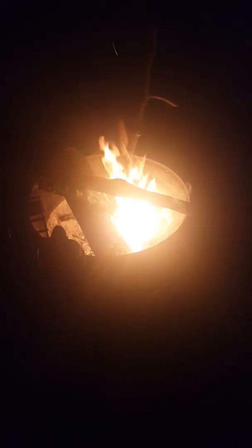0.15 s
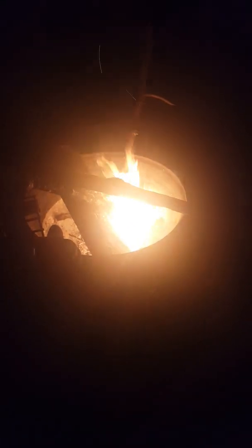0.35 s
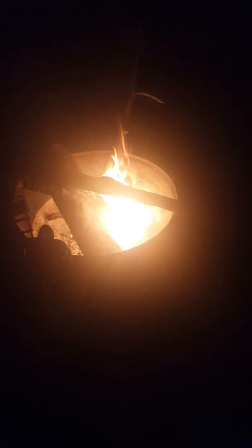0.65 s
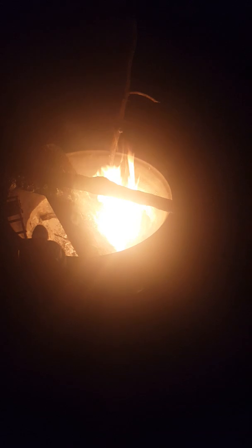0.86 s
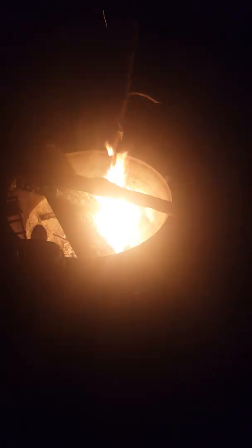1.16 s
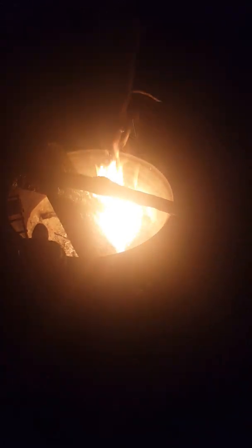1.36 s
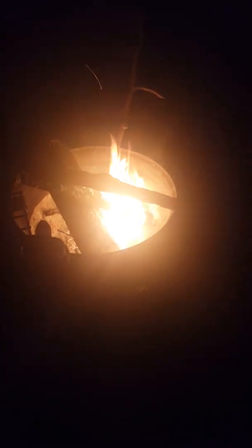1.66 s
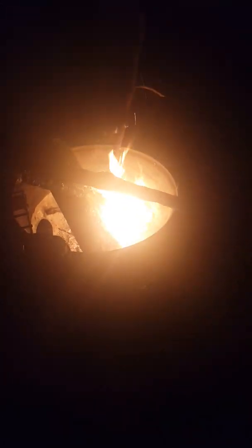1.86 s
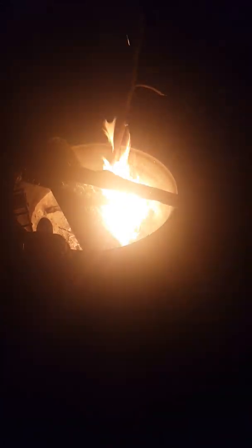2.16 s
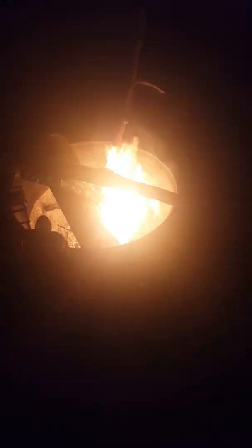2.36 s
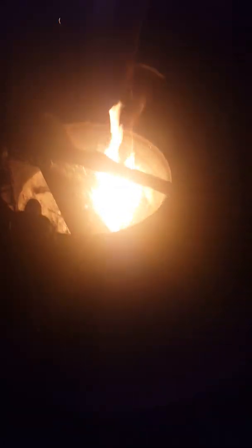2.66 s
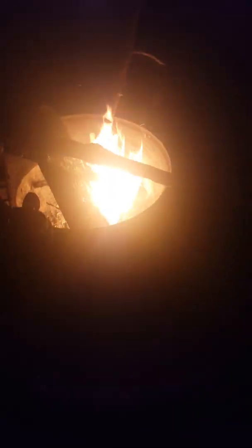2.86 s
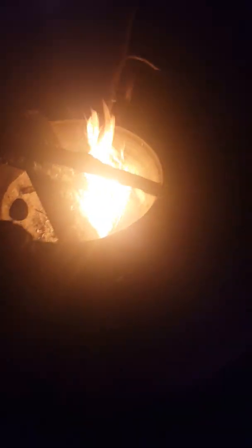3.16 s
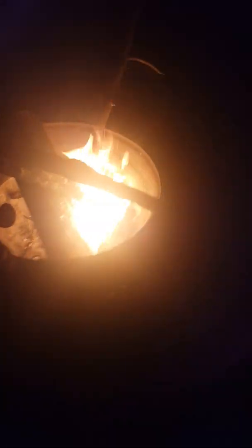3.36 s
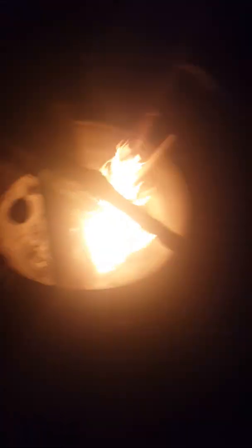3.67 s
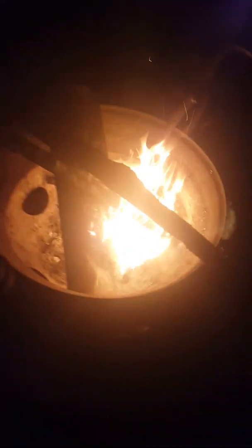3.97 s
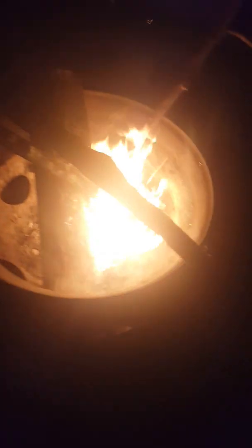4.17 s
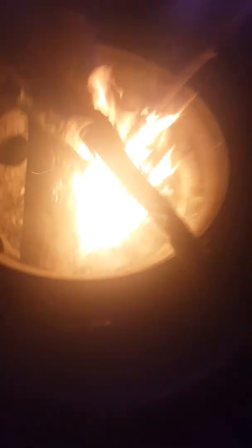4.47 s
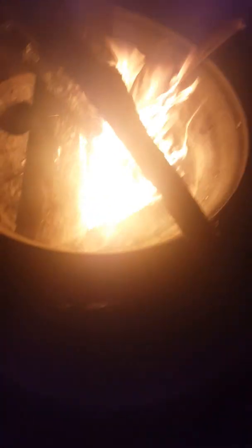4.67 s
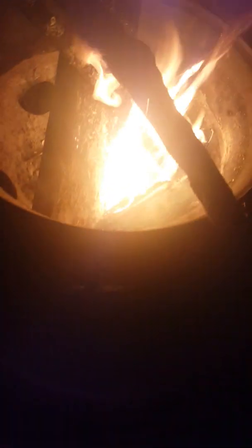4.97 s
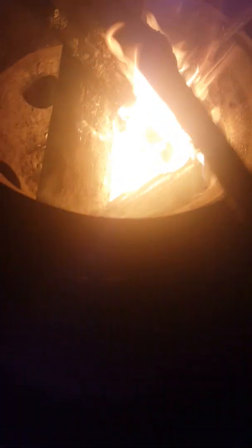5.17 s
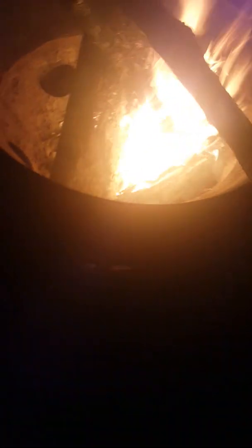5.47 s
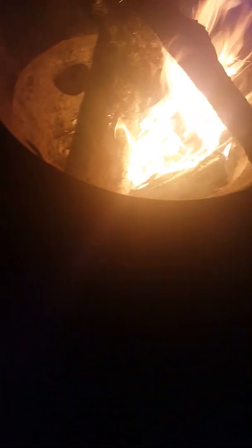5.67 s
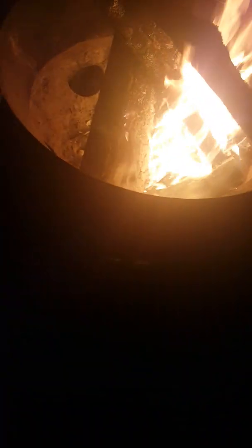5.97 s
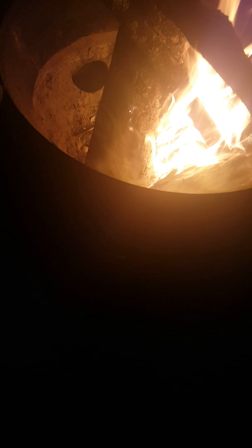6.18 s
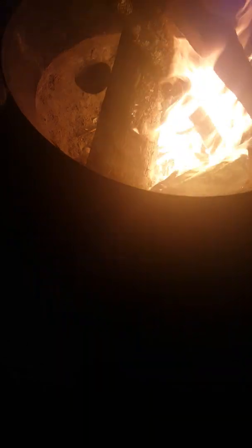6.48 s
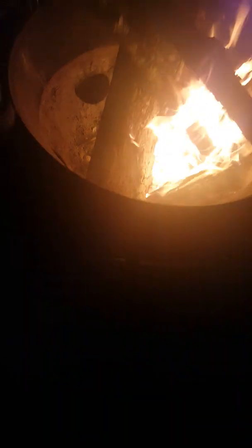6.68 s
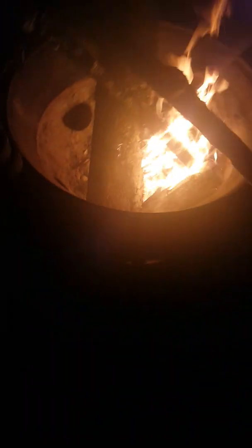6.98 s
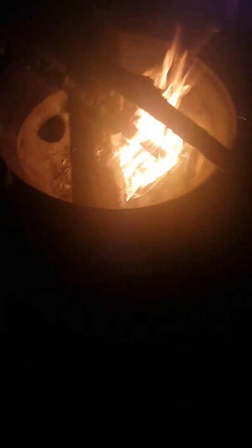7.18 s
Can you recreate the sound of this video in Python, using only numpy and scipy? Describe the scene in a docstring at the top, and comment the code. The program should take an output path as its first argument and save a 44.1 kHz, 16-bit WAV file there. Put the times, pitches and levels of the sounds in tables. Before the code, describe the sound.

A dense chorus of crickets and shimmering katydids surrounds a small campfire, heard through a hissy handheld stereo microphone. The flames rumble softly in uneven puffs. A short burst of rubbing and knocks hits the right side at about two and a half to three seconds. Then come closer, sharper pops, sputtering flares, little spits of steam and dry snaps, while a nearer cricket trill rises and fades.

```python
"""Campfire and night insects

A wood fire burns in a metal pit at night, inside a chorus of crickets and katydids, over a steady microphone hiss.
Filtered noise makes the flames, the hiss, the jets of steam and the finger's rub; short pulses make pops and knocks.
Snapping logs are ringing noise bursts, singing insects are strings of sine syllables, and faint tones waver.
A finger shifts its grip on the hand-held camera and rubs across the right microphone port."""
import sys
import numpy as np
from scipy import signal
from scipy.fft import rfft, irfft, next_fast_len
from scipy.io import wavfile

SR = 44100
rng = np.random.default_rng(int(sys.argv[2]) if len(sys.argv) > 2 else 0)


def int16_out(signal):
    """Quantize to a 16-bit WAV file."""
    q = np.round(np.clip(np.atleast_2d(signal).T, -1, 1) * 32767)
    wavfile.write(sys.argv[1], SR, q.astype(np.int16))


N = 323470
TIME = np.arange(N) / SR  # seconds
EDGE_HZ = 15900  # upper limit of the sound that is kept


def from_db(db):
    """Turns decibels into a gain."""
    return 10 ** (np.asarray(db) / 20)


def unit(x):
    """Scales a sound to an rms (average strength) of one."""
    return x / np.sqrt(np.mean(x ** 2) + 1e-20)


def follow(rows):
    """Draws straight lines between the rows of a curve, giving each column sample by sample."""
    seconds, *columns = np.transpose(rows)
    return [np.interp(TIME, seconds, column) for column in columns]


def read(points, hz):
    """Looks up a spectrum between its points, on a log-frequency axis."""
    point_hz, value = np.transpose(points)
    return np.interp(np.log(hz + 1), np.log(point_hz + 1), value)


def colour(x, gain):
    """Filters a sound by a gain that is a function of frequency."""
    size = next_fast_len(N + 4096)
    hz = np.fft.rfftfreq(size, 1 / SR)
    return irfft(rfft(x, size) * gain(hz), size)[..., :N]


def shaped(x, points):
    """Gives a sound the spectrum in a table, at unit level."""
    return unit(colour(x, lambda hz: from_db(read(points, hz))))


def drift(rate_hz):
    """Wanders by chance at unit size, joining 2 * rate_hz random points a second until 4096 run out."""
    knots = rng.standard_normal(4096)
    return unit(np.interp(TIME * rate_hz * 2, np.arange(len(knots)), knots))


def panned(db):
    """Left and right gains for a left-minus-right level difference."""
    return from_db(np.array([db, -db]) / 2)


def add(mix, s, sound):
    """Mixes a short two-channel sound in, starting at time s."""
    start = max(round(s * SR), 0)
    part = mix[:, start:][:, :sound.shape[1]]
    part += sound[:, :part.shape[1]]


def scatter(x, t60, wet_db):
    """Adds a diffuse tail of echoes, different at each port, that falls 60 dB in t60 seconds."""
    t = np.arange(SR // 2) / SR
    tail = rng.standard_normal((2, len(t))) * from_db(-60 * t / t60)
    tail /= np.linalg.norm(tail, axis=1, keepdims=True)
    return x + from_db(wet_db) * signal.fftconvolve(x, tail, axes=1)[:, :N]


def pulse(hz, cycles, crack_db, crack_t60):
    """A pressure swing that builds and dies within a few cycles, with a brief midrange crack."""
    t = np.arange(2600) / SR
    swing = np.sqrt(t) * np.exp(-t * hz / cycles) * np.sin(2 * np.pi * hz * t)
    midrange = signal.butter(2, [900, 3900], "band", fs=SR)
    grit = signal.lfilter(*midrange, rng.standard_normal(len(t)))
    crack = (unit(grit) + .14 * rng.standard_normal(len(t))) / 2
    return swing / abs(swing).max() + crack * from_db(crack_db - 60 * t / crack_t60)


def singer(hz, rate, sag_hz, waver_hz, unsteady):
    """Each wing stroke sounds one nearly pure syllable that sags in pitch."""
    strokes = np.cumsum(rate * (1 + unsteady * drift(rate_hz=3))) / SR
    stroke = (strokes + rng.random()) % 1  # 0 to 1 through each stroke
    pitch = hz - sag_hz * (2 * stroke - 1) + waver_hz * drift(rate_hz=25)
    return np.sin(np.pi * stroke) ** 4 * np.sin(2 * np.pi * np.cumsum(pitch) / SR)


def resonate(x, hz, width_hz):
    """A resonance of gain one that follows a moving pitch: shift it to 0 Hz, smooth, shift back."""
    turn = np.exp(2j * np.pi * np.cumsum(hz) / SR)
    r = np.exp(-np.pi * width_hz / SR)
    return 2 * (turn * signal.lfilter([1 - r], [1, -r], x / turn)).real


# How alike the noise is at left and right. Each row: frequency in Hz, likeness from 0 to 1.
PORT_LIKENESS = [(30, 0.92), (150, 0.96), (300, 0.93), (600, 0.47), (1200, 0), (3000, 0), (9000, 0)]


def paired_noise():
    """White noise that is nearly alike at both ports in the bass and separate in the treble."""
    a, b = rng.standard_normal((2, N))

    def same(hz):
        return np.clip(read(PORT_LIKENESS, hz), 0, .999)

    right = colour(a, same) + colour(b, lambda hz: np.sqrt(1 - same(hz) ** 2))
    return np.array([a, right])


def flare(start, length):
    """A flare rises over 45% of its length, then sinks back a little more slowly, with a rounded top."""
    return np.interp((TIME - start) / length, [0, .45, 1], [0, 1, 0]) ** .45


# The steady burn, louder by the end as the camera comes close. Each row: time in seconds, rumble in dB,
# dB added in the deep bass, sputter in dB (both levels before the final trim).
STEADY_BURN = [(0, -57, -1.5, -70), (1.3, -52.5, -6, -74), (2.25, -53.5, -4.5, -70.5), (2.6, -55, 0, -66),
               (3.15, -53.5, -1.5, -69), (3.7, -52, -2.5, -67), (4.5, -52, 0.5, -65), (5.4, -55, 4, -69),
               (6.2, -52.5, 1.5, -68), (7.33, -51, 0, -64.5)]
# The flames flare up. Each row: start in seconds, length in seconds, rumble in dB, sputter in dB
# (before the final trim).
FLARE_UPS = [(0.44, 0.19, -53.5, -68.5), (1.193, 0.18, -50.5, -79), (2.175, 0.075, -50, -78),
             (2.452, 0.32, -50.5, -61), (3.138, 0.06, -62, -61.5), (3.272, 0.045, -47, -66),
             (3.409, 0.076, -52, -49.5), (3.485, 0.23, -52.5, -60), (3.847, 0.078, -54.5, -81),
             (4.028, 0.08, -46.5, -64), (4.3, 0.067, -61, -57), (4.5, 0.24, -52, -56.5),
             (4.693, 0.16, -56, -58), (4.961, 0.039, -67, -59), (5.16, 0.19, -57, -64.5),
             (5.666, 0.083, -50, -65), (5.977, 0.047, -47, -63), (6.225, 0.12, -53.5, -70),
             (7.03, 0.087, -50, -59.5)]
# Tone colour of the rumble, then of the sputter. Each row: frequency in Hz, relative level in dB per Hz.
RUMBLE_COLOUR = [(12, -31), (20, -24), (22, -26), (60, -3), (75, -2), (206, -0.5), (285, -2.5), (318, -8.5),
                 (355, -9.5), (407, -15), (520, -18), (680, -24), (1140, -120)]
SPUTTER_COLOUR = [(200, -59), (450, -9.5), (650, 2), (850, 1.5), (1200, -3.5), (1600, -9), (2200, -20),
                  (3400, -10), (6000, -23.5), (9000, -39)]


def flames(rumble_db=1.0, flutter_db=2, sputter_db=2, spit_db=2, boom_hz=210, burst_db=-2, bursts_per_s=260):
    """Turbulent burning: a lumpy rumble, and a sputter of tiny bursts that flares with the same lumps."""
    rumble_level, boom, sputter_level = follow(STEADY_BURN)
    rumble, sputter = from_db(rumble_level), from_db(sputter_level)
    for start, length, low_db, high_db in FLARE_UPS:
        swell = flare(start, length)
        rumble = np.hypot(rumble, from_db(low_db) * swell)
        sputter = np.hypot(sputter, from_db(high_db) * swell)
    lumps = drift(rate_hz=32)
    low = shaped(paired_noise() * from_db(flutter_db * lumps), RUMBLE_COLOUR)
    deep = colour(low, lambda hz: 1 / (1 + (hz / boom_hz) ** 4))
    low = low + (from_db(boom) - 1) * deep
    bursts = unit(paired_noise() * (rng.random(N) < bursts_per_s / SR))
    # the bursts stand out more when the sputter is strong
    flaring = np.interp(20 * np.log10(sputter), [-72, -62], [.3, 1])
    crackly = paired_noise() + from_db(burst_db) * flaring * bursts
    high = shaped(crackly * from_db(spit_db * lumps), SPUTTER_COLOUR)
    return low * rumble * from_db(rumble_db) + high * sputter * from_db(sputter_db)


# Steady hiss of the microphone. Each row: time in seconds, level in dB before level_db is added.
MIC_HISS = [(0, -71.5), (1.0, -72.5), (1.6, -67.5), (2.4, -71), (3.3, -70), (4.6, -67.5), (6.1, -69),
            (7.33, -67.5)]
# Jets of steam. Each row: start in seconds, length in seconds, level in dB.
STEAM_JETS = [(4.677, 0.12, -51), (5.37, 0.086, -61.5), (5.45, 0.08, -57), (6.23, 0.078, -67),
              (6.432, 0.14, -65), (6.765, 0.12, -59), (7.03, 0.3, -65.5)]
# Faint whistles. Each row: middle in seconds, half length in seconds, level in dB.
FAINT_WHISTLES = [(1.58, 0.31, -73.5), (4.05, 0.5, -75), (4.73, 0.07, -65), (7.135, 0.19, -69.5)]
# Tone colour of the hiss and the jets. Each row: frequency in Hz, relative level in dB per Hz.
HISS_COLOUR = [(2500, 3.5), (5000, 3.5), (6300, -2), (7200, -3.5), (8400, -1), (9800, -5), (12000, -6),
               (14000, -4.5), (15800, -8)]


def hiss_and_steam(level_db=5.0, fizz_db=1, spit_db=3, spits_per_s=220, spit_t60=0.017, whistle_hz=8400,
                   whistle_width_hz=900):
    """A steady microphone hiss; over it, spitting jets of steam open fast and fade, with faint whistles."""
    level, = follow(MIC_HISS)
    whistle, jets = np.zeros(N), np.zeros(N)
    for middle, half, db in FAINT_WHISTLES:
        whistle += from_db(db) * np.exp(-((TIME - middle) / half) ** 2)
    for start, length, db in STEAM_JETS:
        jets += from_db(db) * np.interp((TIME - start) / length, [0, .2, .65, 1], [0, 1, .55, 0])
    # in the jets, each droplet of sap bursts at once and dies in a few milliseconds
    droplets = (rng.random(N) < spits_per_s / SR) * from_db(spit_db * rng.standard_normal(N))
    keep_per_sample = from_db(-60 / (spit_t60 * SR))
    spitting = unit(.5 + unit(signal.lfilter([1], [1, -keep_per_sample], droplets)))
    fizz = fizz_db * drift(rate_hz=410)  # flickers for the first five seconds, then holds still
    strength = from_db(level + level_db + fizz) + jets * spitting
    narrow = unit(colour(paired_noise(), lambda hz: 1 / (1 + ((hz - whistle_hz) / whistle_width_hz) ** 2)))
    return strength * shaped(paired_noise(), HISS_COLOUR) + whistle * narrow


def swarm(groups, near_db, count=3):
    """In each group countless far singers blur into a band; a few nearer ones keep their syllables."""
    out = np.zeros((2, N))
    for hz, spread_hz, db, rate in groups:
        far = unit(colour(rng.standard_normal((2, N)), lambda f: np.exp(-((f - hz) / spread_hz) ** 2 / 4)))
        near = np.zeros((2, N))
        offsets = np.linspace(-.7, .7, count)
        for offset, (speed, side) in zip(offsets, rng.uniform(.2, .8, (count, 2))):
            song = singer(hz + offset * spread_hz, rate * (.5 + speed), sag_hz=60, waver_hz=24.85, unsteady=.06)
            near += np.sqrt([[side], [1 - side]]) * song * from_db(2 * drift(rate_hz=1.8))
        near = unit(scatter(near, t60=0.4, wet_db=3.5))
        out += from_db(db) * (far + from_db(near_db) * near)
    return unit(out)


# Groups of crickets, then of katydids. Each row: middle pitch in Hz, spread in Hz, level in dB relative
# to the other groups, typical syllables a second (each singer keeps its own pace around this).
CRICKET_GROUPS = [(1930, 76, -13.5, 40), (2281, 85, -0.5, 55), (2774, 80, -5.5, 68), (2487, 340, -7, 60)]
KATYDID_GROUPS = [(4053, 120, 0.5, 79), (4306, 115, 1, 117), (4760, 170, -7.5, 110), (5155, 190, -10, 180)]
# Far crickets. Each row: time in seconds, level in dB before crickets_db, left minus right in dB.
CRICKET_CURVE = [(0, -52, 0), (1.5, -52, -1.5), (2.1, -53.5, -0.5), (3.1, -54.5, 1), (6.55, -56, 3.5),
                 (7.05, -53, 1), (7.33, -54.5, 1)]
# The katydids swell and ebb together. Each row: time in seconds, level in dB before katydids_db.
KATYDID_CURVE = [(0, -54.5), (0.65, -54), (1.3, -55.5), (1.63, -52.5), (2.4, -55.5), (3.1, -54.5),
                 (3.6, -52.5), (4.75, -55), (5.9, -53), (6.12, -56), (7.08, -53), (7.33, -55)]


def chorus(crickets_db=3, katydids_db=1.5, swell_db=0.48, katydid_pan_db=0.7):
    """Crickets and, above them in pitch, the rasp of katydids, all round in the trees."""
    low, low_pan = follow(CRICKET_CURVE)
    high, = follow(KATYDID_CURVE)
    crickets = swarm(CRICKET_GROUPS, near_db=-2.5) * from_db(low + crickets_db) * panned(low_pan)
    swell = swell_db * drift(rate_hz=4)
    katydids = swarm(KATYDID_GROUPS, near_db=-7.5) * from_db(high + katydids_db + swell)
    return crickets + katydids * panned(katydid_pan_db)[:, None]


# The near cricket comes and goes. Each row: time in seconds, level in dB before level_db is added.
TRILL_CURVE = [(0, -82), (1.0, -65), (2.3, -54.5), (3.3, -54), (4.8, -62), (6.9, -58.5), (7.33, -84)]


def near_cricket(hz=1935, rate=45.3, level_db=-1):
    """One trill stands out of the chorus, its syllables smeared by the trees."""
    level, = follow(TRILL_CURVE)
    song = singer(hz, rate, sag_hz=50, waver_hz=15.98, unsteady=0.013)
    smeared = scatter(np.array([song, song]), t60=0.32, wet_db=2)
    return from_db(level + level_db) * unit(smeared)


# Far tones. Each row: pitch in Hz, level in dB at first, level in dB at last, flicker in dB.
FAR_TONES = [(1360, -76.5, -75.5, 1.3), (790, -77.5, -91, 4), (533, -79.5, -82.5, 1.5)]


def whine(waver_hz=3.53, flickers_per_s=6):
    """Thin, faint tones far off whose pitch and level waver."""
    out = np.zeros(N)
    for hz, first_db, last_db, flicker_db in FAR_TONES:
        pitch = hz + waver_hz * drift(rate_hz=6)
        tone = unit(np.sin(2 * np.pi * np.cumsum(pitch) / SR))
        flicker = flicker_db * drift(rate_hz=flickers_per_s)
        out += tone * from_db(np.linspace(first_db, last_db, N) + flicker)
    return out


# Wood fibres snapping. Each row: time in seconds, peak in dB before the echoes, pitch in Hz.
FIBRE_SNAPS = [(1.063, -51.5, 12500), (1.472, -50, 14000), (2.548, -50, 8400), (2.996, -49, 7500),
               (3.6362, -40, 7000), (4.017, -47, 8500), (4.279, -42, 12500), (4.652, -42, 8700),
               (4.7595, -41, 8300), (4.7792, -38, 6960), (4.801, -39, 6500), (4.857, -47, 6750),
               (4.916, -27.5, 7400), (4.9146, -31, 3850), (5.023, -48, 7500), (5.174, -48, 10500),
               (5.8272, -39, 6160), (5.913, -48, 7000), (6.531, -47, 14500), (6.675, -50, 13500),
               (6.935, -50, 13000)]


def ticks(t60=0.01, count=170):
    """Snapping fibres: a sharp bright burst each, a few loud and many faint; louder snaps are broader."""
    out, t = np.zeros((2, N)), np.arange(1024) / SR
    faint = []
    for a, b, c in rng.random((count, 3)):
        # faint snaps crowd a little towards the end
        faint.append((N / SR * a ** .65, -61 - 2.8 * np.log(b + .03), 7000 + 7000 * c))
    for s, db, hz in FIBRE_SNAPS + faint:
        sharpness = np.interp(db, [-42, -28], [3.5, 1.4])
        ring = signal.iirpeak(min(hz, EDGE_HZ), sharpness, fs=SR)
        burst = rng.standard_normal((2, len(t))) * from_db(-60 * t / t60)
        snap = signal.lfilter(*ring, burst)
        add(out, s, from_db(db) * snap / abs(snap).max())
    return scatter(out, t60=.05, wet_db=-15)


# Pockets of gas igniting. Each row: time in seconds, peak of the blow in dB before the echoes, pitch in Hz,
# crack in dB relative to the blow.
GAS_POPS = [(0.083, -37, 278, -18), (0.812, -39, 240, -18), (2.251, -39, 266, -7), (2.427, -38.5, 260, -18),
            (3.409, -33.5, 704, -13), (3.4418, -27, 690, -13), (3.449, -31, 830, -19),
            (3.507, -35.5, 1020, -9), (3.529, -32.5, 230, -24), (3.818, -38, 1020, -13),
            (4.1253, -22, 820, -7), (4.072, -39, 293.5, -16), (4.1847, -33.5, 410, -3),
            (4.542, -34, 258, -12), (4.598, -35.5, 214, -16), (4.62, -34, 332, -10), (4.795, -37, 646, -8),
            (5.308, -36.5, 330, -18), (5.699, -35, 266, -15), (6.713, -36, 220, -20),
            (6.8923, -32.5, 794, -6), (6.914, -38, 252, -7), (7.0419, -26, 636, -2.5),
            (7.0421, -33, 230, -14), (7.046, -35, 700, -6)]


def pops():
    """Each pocket of gas gives a short blow and a crack, which rattle round the bowl."""
    out = np.zeros((2, N))
    for s, db, hz, crack_db in GAS_POPS:
        wave = pulse(hz, 0.4, crack_db, crack_t60=0.013)
        add(out, s, from_db(db) * np.array([np.roll(wave, 12), wave]))  # left is 12 samples later
    return scatter(out, t60=.05, wet_db=-10)


# Finger rubbing. Each row: time in seconds, left port in dB, right port in dB (both before rub_db),
# squeak share from 0 to 1, pitch in Hz of the gap under the finger.
FINGER_RUB = [(2.684, -66, -44, 0, 900), (2.696, -37, -33, 0, 1000), (2.715, -51, -29, 0, 1120),
              (2.73, -46, -33.5, 0.1, 1300), (2.745, -36, -29, 0, 1490), (2.77, -35, -29, 0.24, 1800),
              (2.795, -43.5, -26, 0.17, 2130), (2.84, -54, -29, 1, 2400), (2.868, -37, -23, 0.63, 2400),
              (2.877, -52, -27, 0.3, 2400), (2.888, -63, -52, 1, 2400)]
# Tone colour of skin dragging, then of skin squeaking. Each row: frequency in Hz, relative level in dB per Hz.
DRAG_COLOUR = [(60, -9), (250, -11), (700, -3), (1400, -2.5), (2500, 0), (5000, -3.5), (7200, -12.5),
               (12000, -13.5), (15800, -21)]
SQUEAK_COLOUR = [(100, -34), (1000, 1.5), (2400, -2), (3500, -3), (5200, 4), (6800, -1.5), (7600, -9),
                 (10400, -13), (11300, -6), (15800, -21)]
# Finger knocking on the case. Each row: time in seconds, peak of the knock in dB at the right port,
# pitch in Hz, crack in dB relative to the knock, left port in dB relative to the right.
CASE_KNOCKS = [(2.535, -30.5, 328, -7, -30), (2.5686, -28.5, 745, -17, -20), (2.574, -39, 300, -16, -21),
               (2.609, -36, 510, 2.5, -12), (2.644, -40, 604, 4, -7), (2.6741, -23, 840, -4, -11),
               (2.6892, -25.5, 1490, 1, -22), (2.6913, -27.5, 388, 3, -29), (2.821, -9.5, 1760, 0, -22),
               (2.9484, -25, 326, -4, -16), (3.043, -37.5, 388, 0, -20)]


def finger(rub_db=-3, grain_db=1.5, gap_db=5):
    """Skin knocks on the case and drags over the right port in tiny slips; the gap shrinks, rising in pitch."""
    left, right, squeak, gap_hz = follow(FINGER_RUB)
    squeak = np.clip(squeak, 0, 1)
    grain = drift(rate_hz=600) + .5 * drift(rate_hz=90)
    slips = rng.standard_normal((2, N)) * from_db(grain_db * grain)
    drag = shaped(slips, DRAG_COLOUR)
    drag = unit(drag + from_db(gap_db) * resonate(drag, gap_hz, width_hz=870))
    touching = (TIME > FINGER_RUB[0][0]) & (TIME < FINGER_RUB[-1][0])
    skin = (1 - squeak) * drag + squeak * shaped(slips, SQUEAK_COLOUR)
    out = skin * from_db(np.array([left, right]) + rub_db) * touching
    for s, db, hz, crack_db, left_db in CASE_KNOCKS:
        knock = pulse(hz, .55, crack_db, crack_t60=.014)
        add(out, s, from_db(db) * from_db([[left_db], [0]]) * knock)
    return out


def scene():
    """The fire, the microphone hiss, the insects, the far tones and the hand on the camera."""
    fire = flames() + hiss_and_steam() + ticks() + pops()
    insects = chorus() + near_cricket()
    return fire + insects + whine() + finger()


def record(dry):
    """The recorder's band limit: a steep filter removes what lies above EDGE_HZ."""
    low_pass = signal.firwin(511, EDGE_HZ, window=("kaiser", 9), fs=SR)
    return signal.oaconvolve(dry, low_pass[None], "same")


dry = scene()
out = record(dry)
int16_out(out)
```